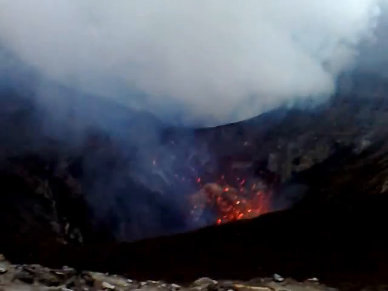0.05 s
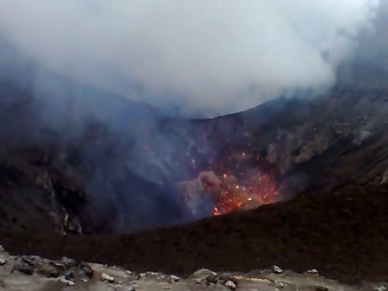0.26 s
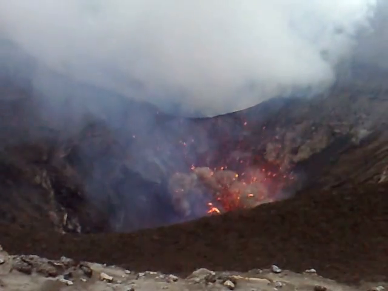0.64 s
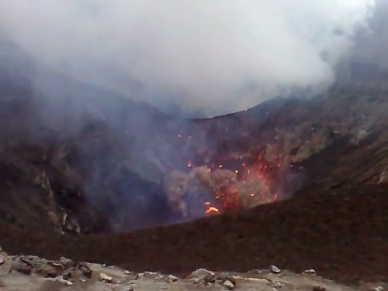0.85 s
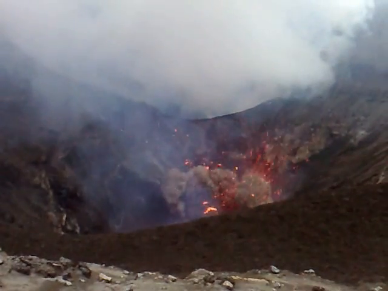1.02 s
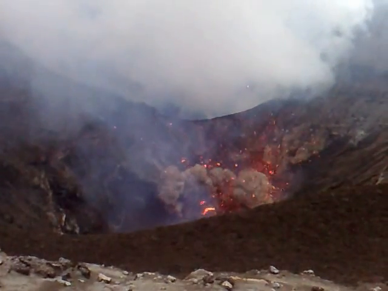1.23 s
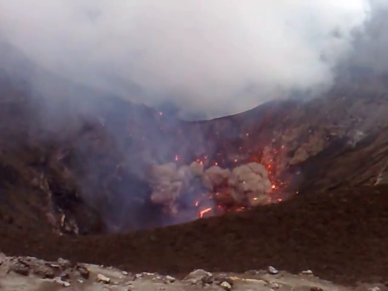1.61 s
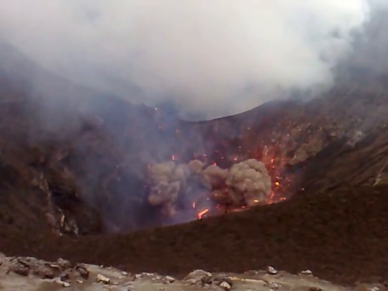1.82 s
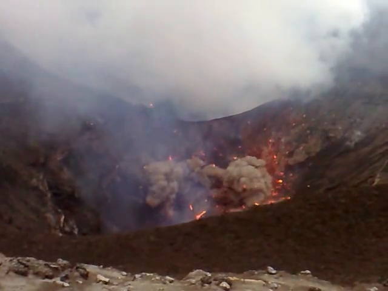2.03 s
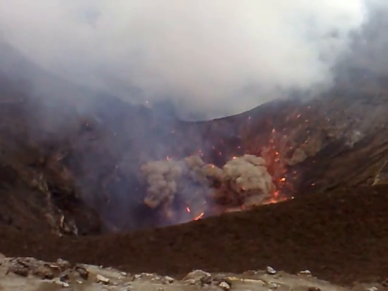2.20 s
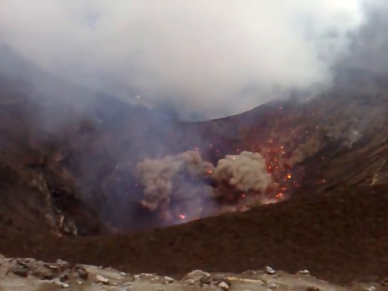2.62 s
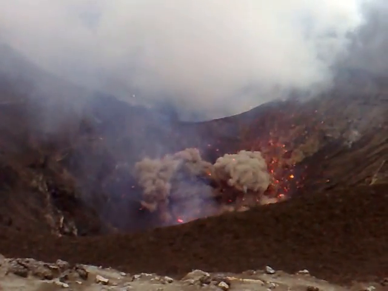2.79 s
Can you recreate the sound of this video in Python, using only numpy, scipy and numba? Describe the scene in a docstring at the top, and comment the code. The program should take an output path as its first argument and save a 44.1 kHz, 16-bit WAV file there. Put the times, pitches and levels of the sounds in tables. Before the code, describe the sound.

A volcanic vent roars low and steady while gusts of wind buffet the microphone.

```python
"""A volcanic vent roars across an open crater: a turbulent gas jet with dense small bursts, each
smeared by the crater walls, swells once over a low rumble. Wind eddies buffet the microphone on the
rim, brighter in each gust and with a few sharp slaps, and die down after two seconds. The bass gathers
into brief throbs, a faint hiss lies behind, and a few small ticks sound close by.
The sound cuts in abruptly after a short silence."""
import sys
import numpy as np
from scipy import signal
from scipy.fft import rfft, irfft
from scipy.io import wavfile
from scipy.ndimage import uniform_filter1d
from numba import njit

SR = 44100
rng = np.random.default_rng(int(sys.argv[2]) if len(sys.argv) > 2 else 0)


def unload_wav(signal):
    """Save mono or channel-first audio to the path in sys.argv[1] as 16-bit WAV at rate SR, clipped to [-1, 1]."""
    wavfile.write(
        sys.argv[1],
        SR,
        np.round(np.clip(np.atleast_2d(signal).T, -1, 1) * 32767).astype(np.int16),
    )


N = 130095
TIME = np.arange(N) / SR
START_S = .234

# Strength of the gas jet: t/s, relative roar level/dB, relative rasp level/dB
JET_LEVELS = [(.24, -28, -31), (.3, -33, -33), (.38, -40, -36.5), (.68, -39, -37), (.85, -37, -36.5),
              (.95, -36.5, -34), (1.1, -36.5, -34.5), (1.27, -32, -35.5), (1.45, -33, -34),
              (1.66, -32, -35), (1.76, -28.5, -32), (1.84, -26, -32.5), (1.91, -32.5, -34.5),
              (2.15, -37.5, -40.5), (2.3, -35, -37.5), (2.55, -39, -42), (2.8, -38.5, -42),
              (2.95, -46, -47)]
# Spectra of the vent's roar, rasp and deep rumble: f/Hz, relative level/dB
ROAR_SPECTRUM = [(300, -28.5), (520, -11.5), (640, -4), (780, -0.5), (980, -1.5), (1130, -7.5),
                 (1290, -16.5), (1600, -24), (3000, -73), (8000, -100)]
RASP_SPECTRUM = [(900, -32), (1300, -11), (1480, -3.5), (1720, 0.5), (1940, -0.5), (2050, -3), (2200, 2),
                 (2450, -4.5), (2750, -10), (3050, -20), (3300, -14.5), (3650, -20.5), (4100, -16.5),
                 (4550, -28.5), (5200, -31.5), (6600, -32.5), (8200, -47.5), (11000, -66), (16000, -76)]
RUMBLE_SPECTRUM = [(15, -18.5), (35, 1.5), (60, 5), (85, 11.5), (130, -6), (300, -2.5), (400, -14),
                   (520, -34), (900, -62), (5000, -120)]
# Strength of the wind's buffeting and of its slow push: t/s, relative level/dB
GUST_LEVELS = [(.24, -18), (.3, -16), (.34, -12), (.365, -18.5), (.395, -9.5), (.445, -9.5), (.47, -12),
               (.505, -10.5), (.545, -17), (.58, -11), (.63, -16), (.665, -24), (.725, -22), (.742, -13.5),
               (.815, -16.5), (.86, -11), (.9, -11.5), (.94, -18), (1.02, -15), (1.15, -21), (1.19, -13),
               (1.24, -23), (1.285, -13), (1.44, -21), (1.475, -12.5), (1.53, -18), (1.63, -15),
               (1.72, -21.5), (1.84, -17.5), (2.05, -24.5), (2.2, -28), (2.33, -26), (2.95, -35.5)]
PUSH_LEVELS = [(.23, -21.5), (.275, -10.5), (.37, -18), (.41, -36), (.47, -14), (.56, -17), (.6, -12.5),
               (.68, -20), (.76, -11.5), (1.08, -19.5), (1.12, -19), (1.2, -14), (1.25, -16), (1.3, -11.5),
               (1.45, -18.5), (1.5, -13.5), (1.83, -18.5), (2.1, -25.5), (2.45, -30.5), (2.72, -34),
               (2.82, -42), (2.95, -25.5)]
# Spectrum of the slow push: f/Hz, relative level/dB
PUSH_SPECTRUM = [(8, -24), (22, 0.5), (45, -1.5), (90, -4), (125, 2), (200, -19.5), (500, -49.5),
                 (3000, -120)]
# Envelope of the hiss: t/s, relative level/dB
HISS_LEVELS = [(.23, -53.5), (.45, -58), (.8, -60.5), (1.3, -64), (1.7, -71.5), (2.6, -70), (2.95, -67.5)]
# Spectrum of the hiss: f/Hz, relative level/dB
HISS_SPECTRUM = [(2000, 4.5), (4000, 22.5), (5200, 12.5), (8000, 5), (10000, -1.5), (14000, -4), (16000, 1)]
# Throbs of the rumble: t/s, duration/s, level/dB, start f/Hz, end f/Hz
THROB_EVENTS = [(0.246, 0.024, -10, 120, 108), (0.333, 0.05, -11, 58, 50), (0.486, .048, -5, 204, 195),
                (0.561, 0.038, -7.5, 155, 132.3), (0.829, .082, -4, 177.8, 112.1),
                (0.902, 0.074, -7.5, 105, 86), (1.091, 0.035, -8, 82, 71), (1.168, .036, -6.5, 155, 135),
                (1.495, 0.048, -11.5, 66, 54), (1.684, 0.031, -9, 97, 92)]
# Nearby ticks: t/s, rise/s, decay/s, crack level/dB, tilt/(dB per octave), ring f/Hz, ring level/dB
TICK_EVENTS = [(0.4126, .0005, 0.0011, -27, 0.5, 4380, -18), (0.4594, .001, .0014, -54, -2, 1150, -17),
               (1.377, 0.0038, .005, -56, 6, 13800, -62), (1.5808, .0005, .001, -43, -2, 4500, -34.5),
               (2.657, .006, 0.0049, -42, -9, 3450, -39), (2.7825, 0.00061, .0036, -34, -3.5, 2930, -41)]
# Spectrum of a tick's crack before its tilt: f/Hz, relative level/dB
CRACK_SPECTRUM = [(500, -14), (1800, 9.5), (3700, 9.5), (5400, 8.5), (6600, -2.5), (9000, -7),
                  (14000, -5.5), (16000, -12.5)]
# Slaps of wind: t/s, peak level/dB, spectral peak f/Hz
SLAP_EVENTS = [(0.4618, -5, 258), (0.7393, -6, 135), (1.4698, -3.5, 225), (1.4747, -8.5, 312)]


def undb(db):
    """Amplitude ratio of a level in decibels."""
    return 10 ** (np.asarray(db) / 20)


def unit(x):
    """Normalisation to rms 1."""
    return x / np.sqrt(np.mean(x ** 2))


def curve(rows, column=1):
    """Linear interpolation of one table column in time."""
    rows = np.array(rows)
    return np.interp(TIME, rows[:, 0], rows[:, column])


def colour(x, spectrum):
    """Spectral shaping by (f/Hz, level/dB) points, normalised to rms 1."""
    hz, db = np.array(spectrum).T
    f = np.maximum(np.fft.rfftfreq(N, 1 / SR), 1)
    gain = undb(np.interp(np.log(f), np.log(hz), db))
    return unit(irfft(rfft(x) * gain, N))


def noise():
    """Gaussian white noise."""
    return rng.standard_normal(N)


def drift(per_s):
    """Moving averages turn noise into a smooth random drift of rms 1."""
    width = int(SR / per_s)
    return unit(uniform_filter1d(uniform_filter1d(noise(), width), width))


def steady(x, window_s=.03, evenness=.92):
    """Envelope compression: dividing by a power of the local rms removes most chance swells."""
    width = int(window_s * SR)
    power = uniform_filter1d(uniform_filter1d(x ** 2, width), width // 2)
    return unit(x / np.maximum(power, 1e-9) ** (evenness / 2))


@njit
def lowpass(x, cutoff_hz, damping):
    """Two integrators in a feedback loop form a state-variable low-pass with a moving cutoff."""
    y, band_state, low_state = np.empty(len(x)), 0., 0.
    for i in range(len(x)):
        g = np.tan(np.pi * cutoff_hz[i] / SR)
        band = (band_state + g * (x[i] - low_state)) / (1 + g * (g + damping))
        y[i] = low_state + g * band
        band_state, low_state = 2 * band - band_state, 2 * y[i] - low_state
    return y


def gas_jet(bursts_per_s=500, burst_share=.23, crater_decay_s=.0082):
    """Jet noise adds in power to random bursts convolved with the response of the crater walls."""
    onsets = rng.random(N) < bursts_per_s / SR
    bursts = onsets * undb(2.5 * np.minimum(rng.exponential(size=N), 3))
    crater_response = noise() * np.exp(-TIME / crater_decay_s)
    crackle = unit(irfft(rfft(bursts - bursts.mean()) * rfft(crater_response), N))
    return np.sqrt(burst_share) * crackle + np.sqrt(1 - burst_share) * noise()


def vent(swell_s=.3, flutter_db=.23):
    """A turbulent jet radiates broadband noise: roar, rasp and rumble, fluttering together."""
    roar_db, rasp_db = curve(JET_LEVELS), curve(JET_LEVELS, column=2)
    roar = colour(gas_jet(), ROAR_SPECTRUM) * undb(roar_db + .5)
    rasp = colour(gas_jet(), RASP_SPECTRUM) * undb(rasp_db + .5)
    rumble = steady(colour(noise(), RUMBLE_SPECTRUM)) * undb(rasp_db + 16.5)
    swell = np.clip((TIME - START_S) / swell_s, 0, 1)  # the rumble builds behind the first rush of gas
    return (roar + rasp + swell * rumble) * undb(flutter_db * drift(per_s=20))


def wind(octaves_per_db=.0349, damping=1.464):
    """Turbulent pressure at the microphone: stronger gusts bring smaller, brighter eddies."""
    gust_db = curve(GUST_LEVELS)
    cutoff_hz = np.clip(296 * 2 ** (octaves_per_db * (gust_db + 12.5)), 60, 2000)
    eddies = signal.sosfilt(signal.butter(2, 102, "high", fs=SR, output="sos"), noise())
    eddies = lowpass(eddies, cutoff_hz, damping)
    eddies = lowpass(eddies, cutoff_hz * 1.313, damping)
    buffeting = steady(eddies / np.sqrt(cutoff_hz)) * undb(gust_db + 1)
    slow_push = steady(colour(noise(), PUSH_SPECTRUM)) * undb(curve(PUSH_LEVELS))
    return buffeting + slow_push


def hiss():
    """Filtered noise with a spectral peak near 4 kHz is heard as a faint, fading hiss."""
    return colour(noise(), HISS_SPECTRUM) * undb(curve(HISS_LEVELS) + 9)


def with_throbs(churn, duck_db=-3, bass_hz=240):
    """Frequency modulation: churning air gathers into unsteady, sinking booms, and its bass gives way."""
    booms, presence = np.zeros(N), np.zeros(N)
    for at, duration, db, start_hz, end_hz in THROB_EVENTS:
        progress = np.clip((TIME - at) / duration, 0, 1)
        hz = start_hz * (end_hz / start_hz) ** progress * (1 + .05 * drift(per_s=76))
        envelope = np.sqrt(np.abs(np.sin(np.pi * progress)))
        booms += undb(db) * envelope * np.sin(2 * np.pi * np.cumsum(hz) / SR)
        presence = np.maximum(presence, envelope)
    bass = signal.sosfiltfilt(signal.butter(2, bass_hz, fs=SR, output="sos"), churn)
    return booms + churn - bass * (1 - undb(duck_db * presence))


def ticks():
    """Damped transients: in each tick a broadband crack and a rough ring decay exponentially."""
    out = np.zeros(N)
    for at, rise, decay, crack_db, tilt, ring_hz, ring_db in TICK_EVENTS:
        age = TIME - at
        envelope = np.clip(age / rise, 0, 1) * np.exp(-np.maximum(age - rise, 0) / decay)
        crack = colour(noise(), [(f, db + tilt * np.log2(f)) for f, db in CRACK_SPECTRUM])
        rough_hz = ring_hz * (1 + .07 * drift(per_s=2400))
        ring = np.sin(2 * np.pi * np.cumsum(rough_hz) / SR)
        out += envelope * (undb(crack_db) * crack + undb(ring_db) * ring)
    return out


def wind_slaps():
    """A single strong eddy gives a bipolar pressure pulse: one push, then one pull."""
    out = np.zeros(N)
    for at, db, hz in SLAP_EVENTS:
        phase = 2 * np.pi * hz * (TIME - at)
        out += undb(db) * -phase * np.exp((1 - phase ** 2) / 2)  # derivative of a Gaussian
    return out


def scene():
    """Superposition: the pressures of all sources add at one microphone."""
    background = hiss()
    churn = vent() + wind()
    return (with_throbs(churn) + background + ticks() + wind_slaps())[None]


def record(dry, ceiling=.98, top_hz=15800):
    """A gate opens abruptly, soft saturation rounds the highest peaks and a low-pass cuts the top."""
    gate = np.clip((TIME - START_S) / .0007, 0, 1)
    rounded = dry / (1 + (dry / ceiling) ** 4) ** (1 / 4)
    return signal.sosfilt(signal.ellip(10, .1, 80, top_hz, fs=SR, output="sos"), gate * rounded)


dry = scene()
out = record(dry)
unload_wav(out)
```